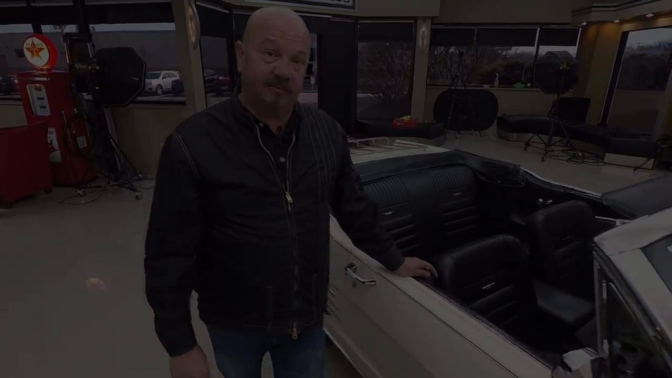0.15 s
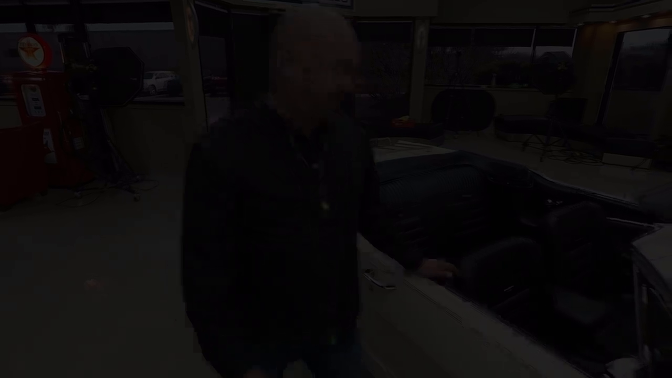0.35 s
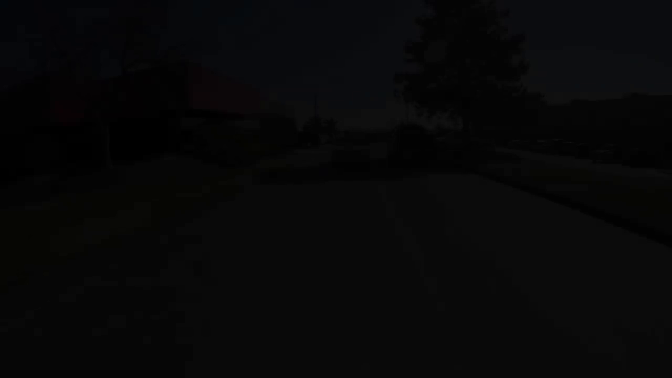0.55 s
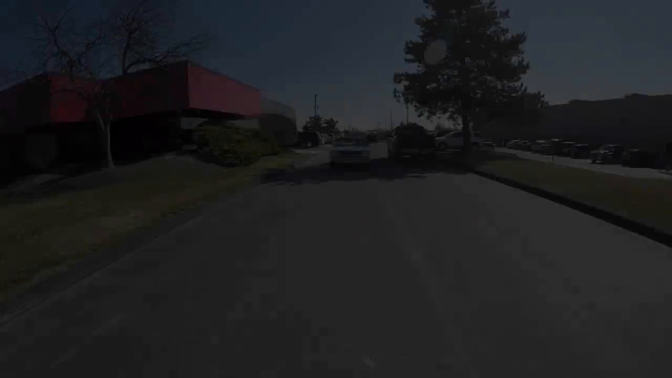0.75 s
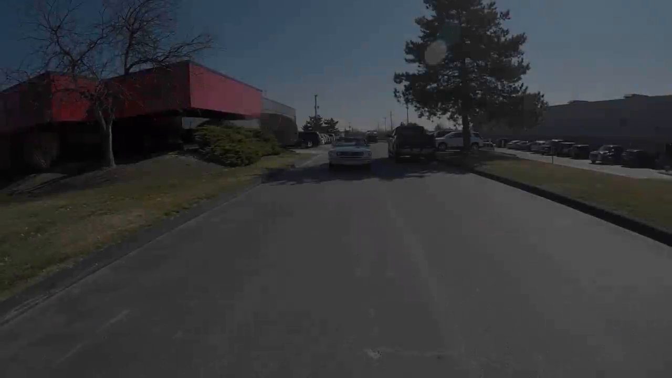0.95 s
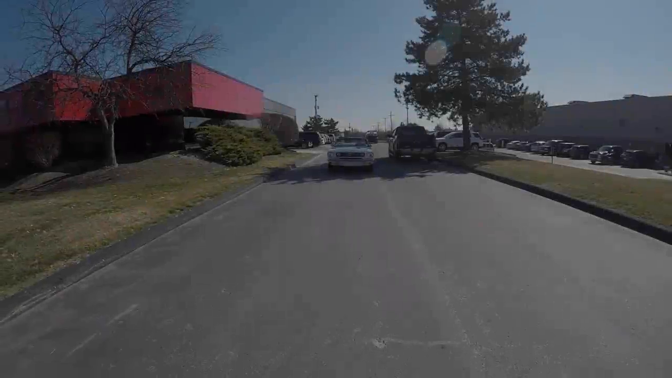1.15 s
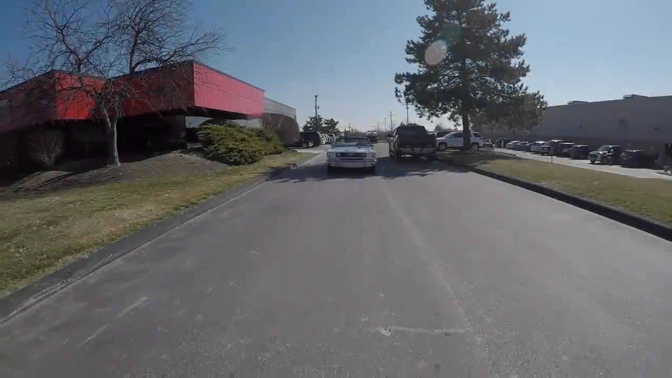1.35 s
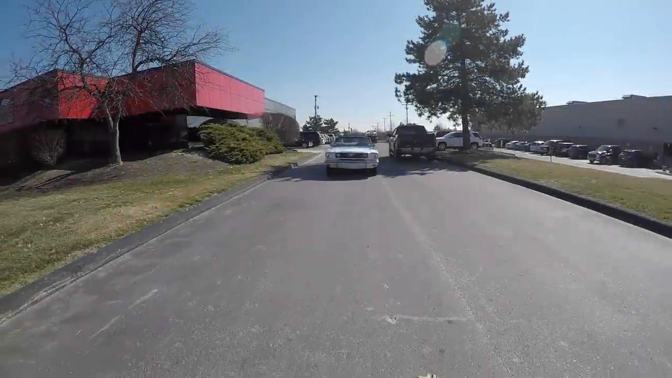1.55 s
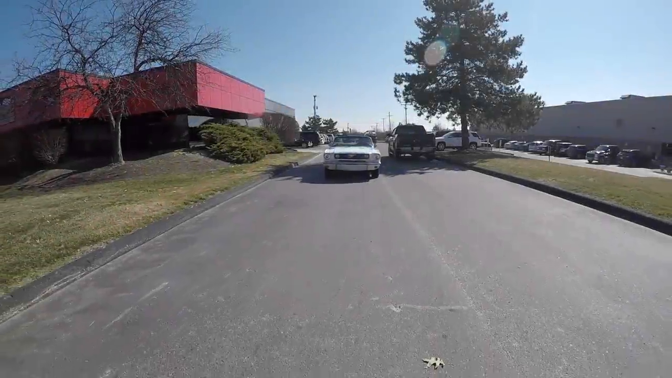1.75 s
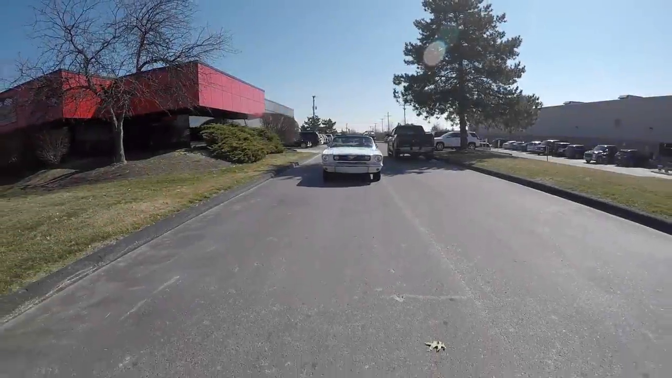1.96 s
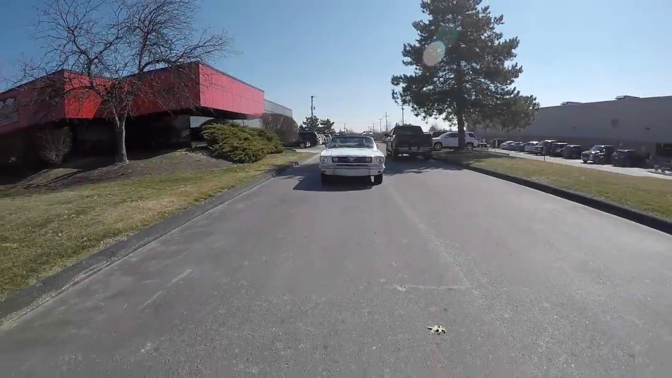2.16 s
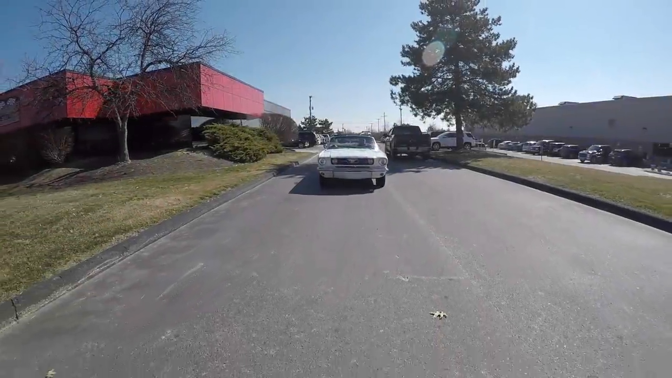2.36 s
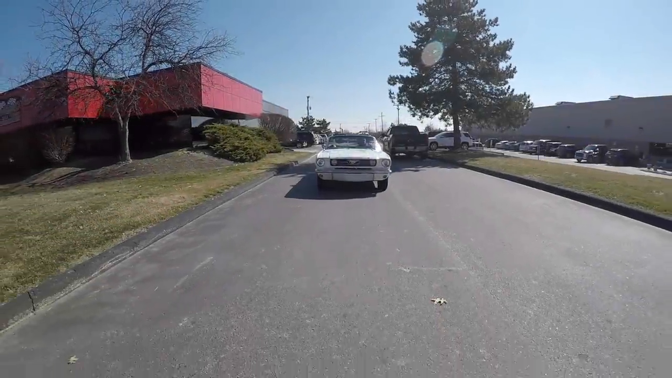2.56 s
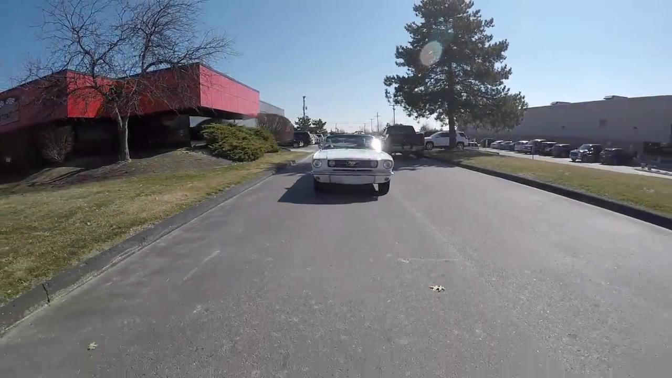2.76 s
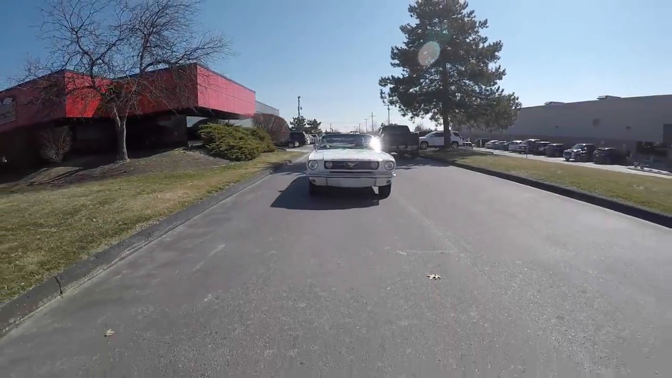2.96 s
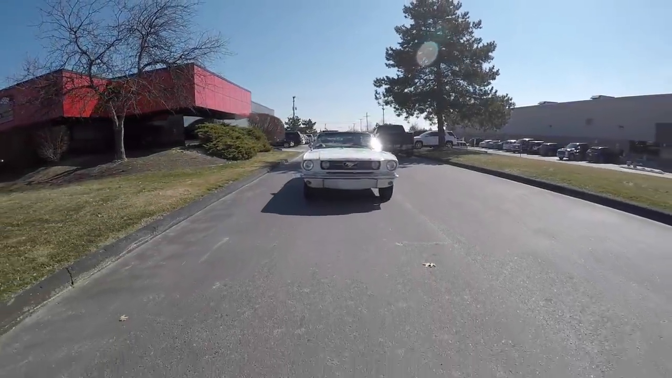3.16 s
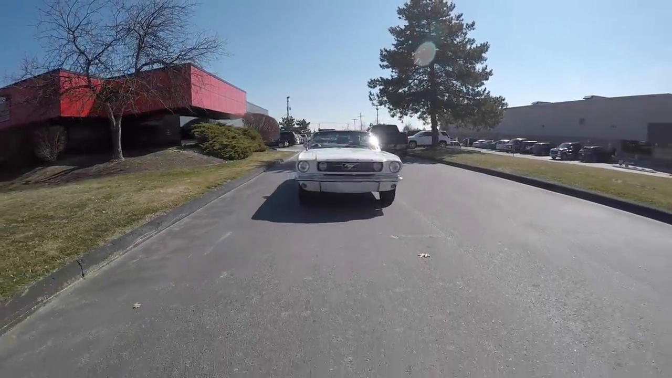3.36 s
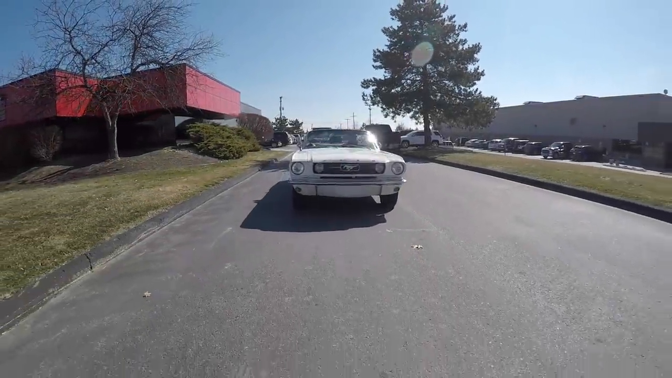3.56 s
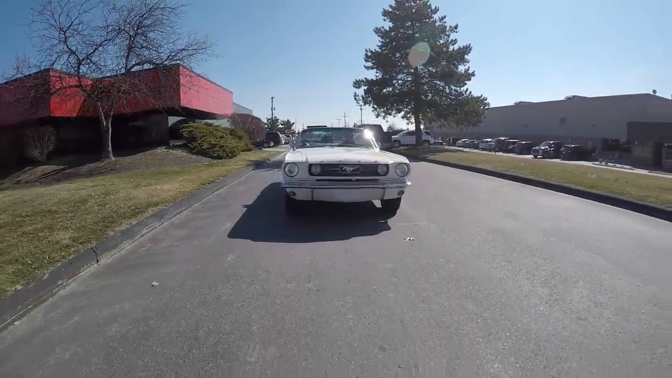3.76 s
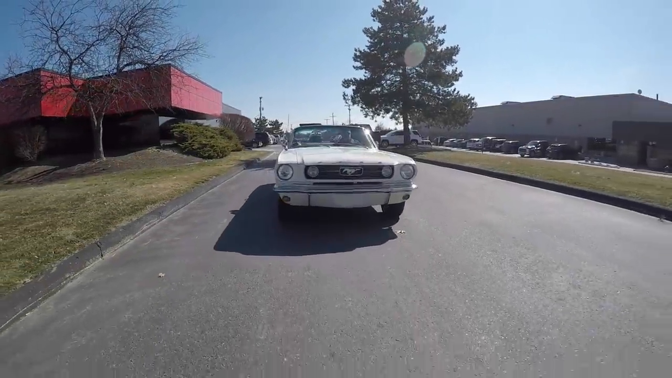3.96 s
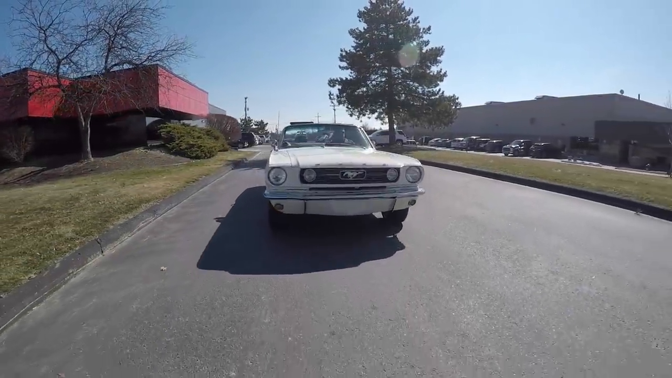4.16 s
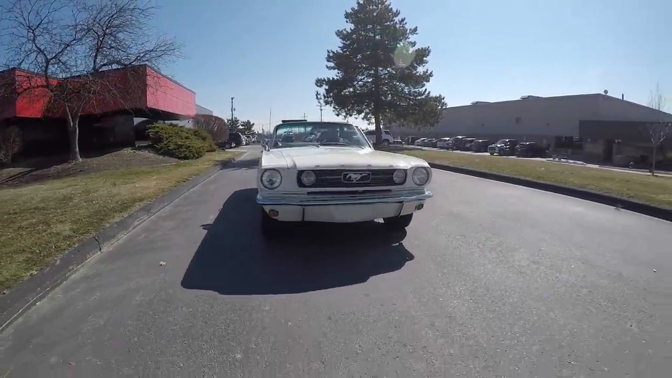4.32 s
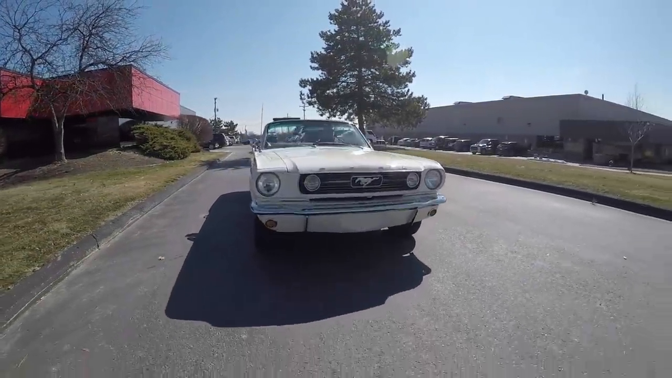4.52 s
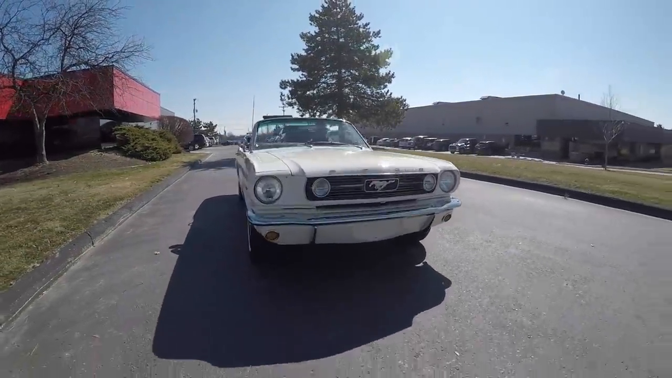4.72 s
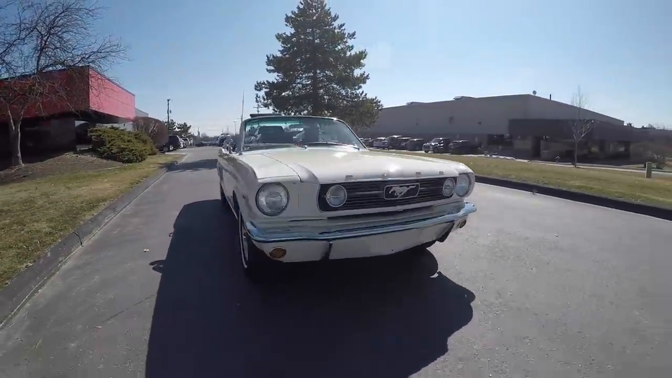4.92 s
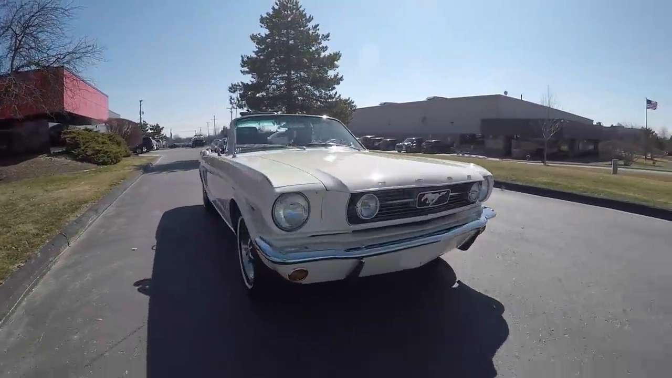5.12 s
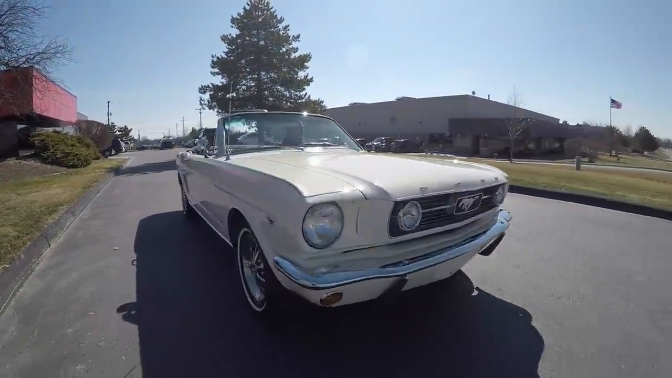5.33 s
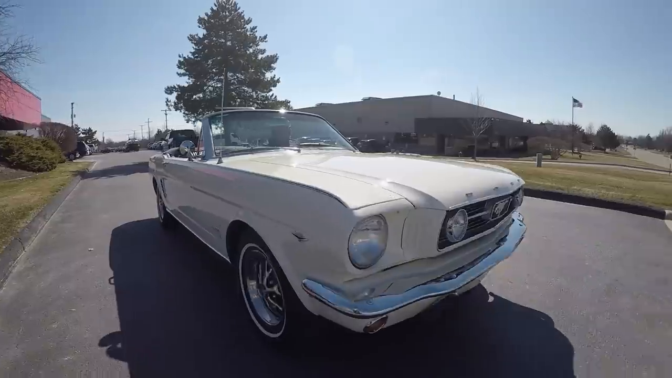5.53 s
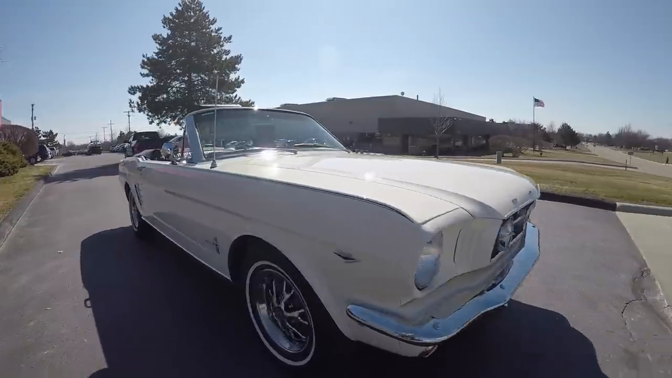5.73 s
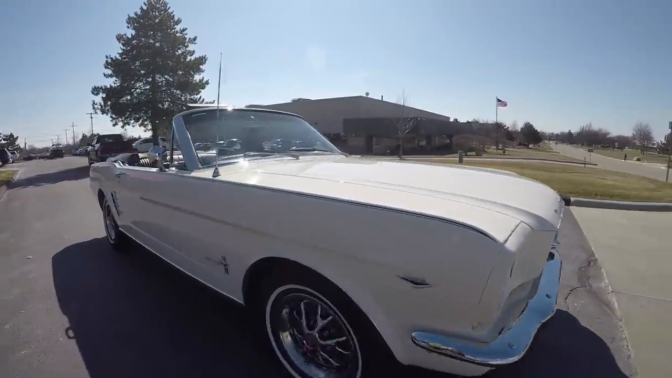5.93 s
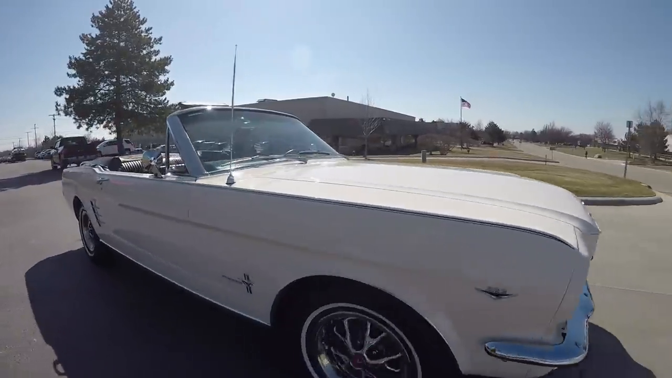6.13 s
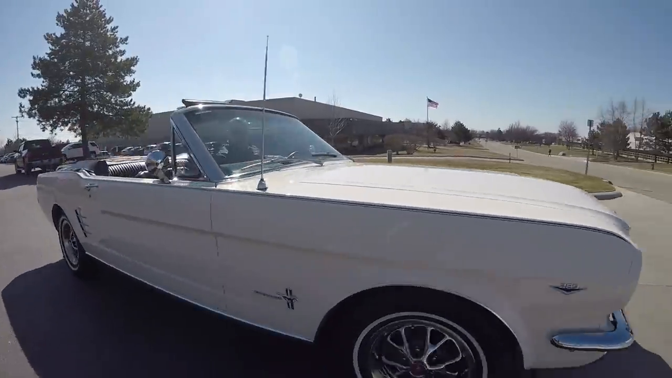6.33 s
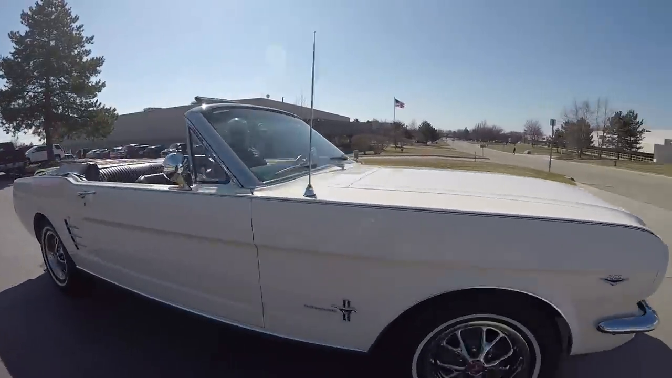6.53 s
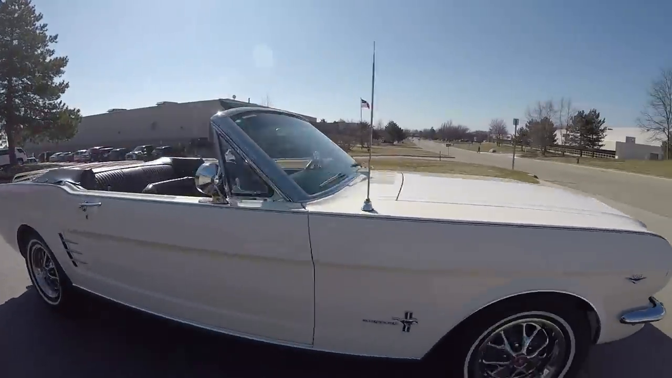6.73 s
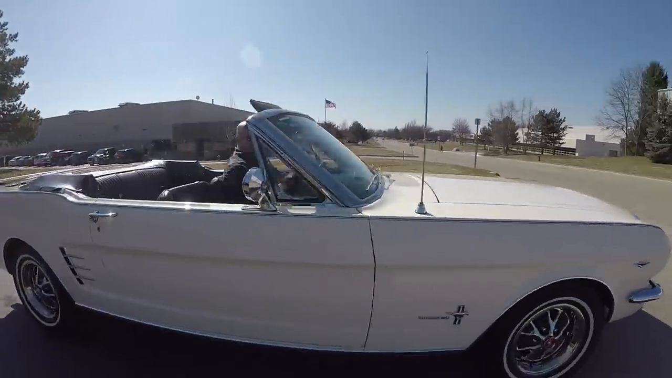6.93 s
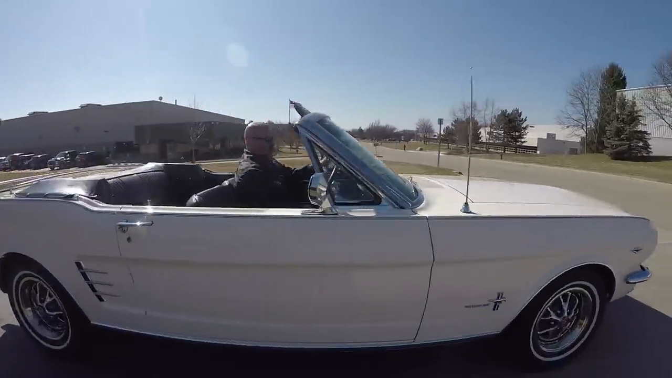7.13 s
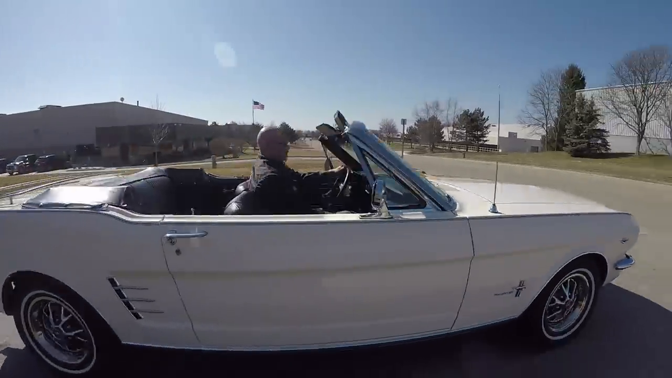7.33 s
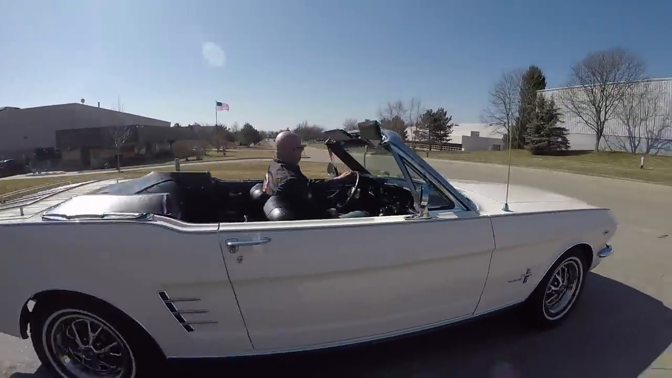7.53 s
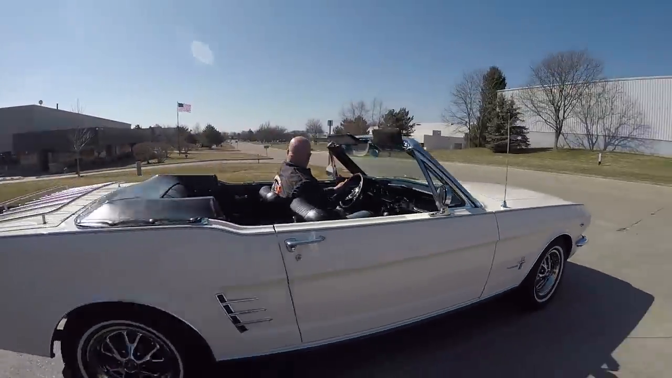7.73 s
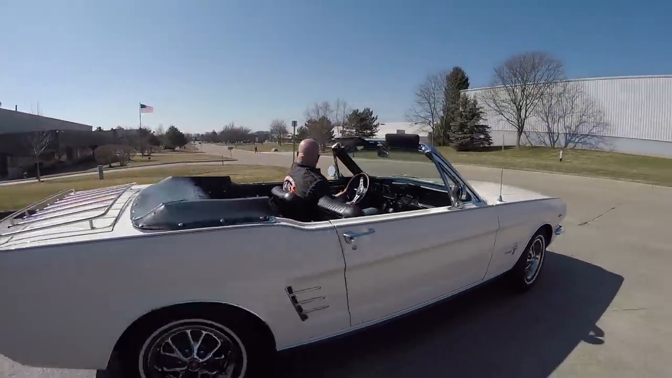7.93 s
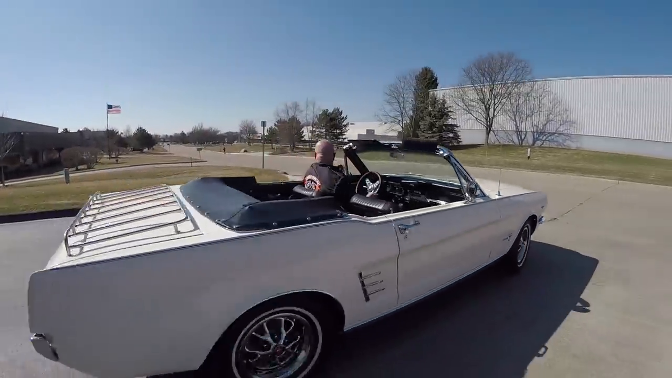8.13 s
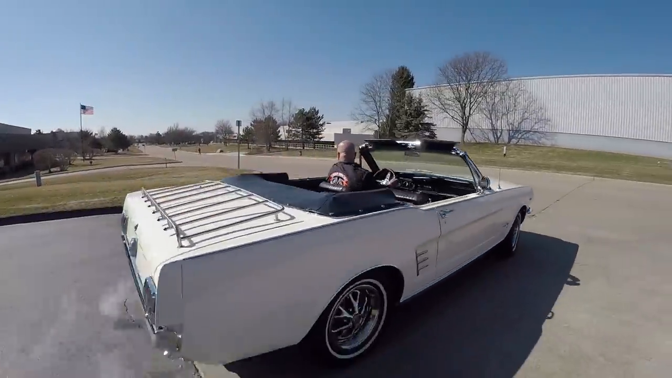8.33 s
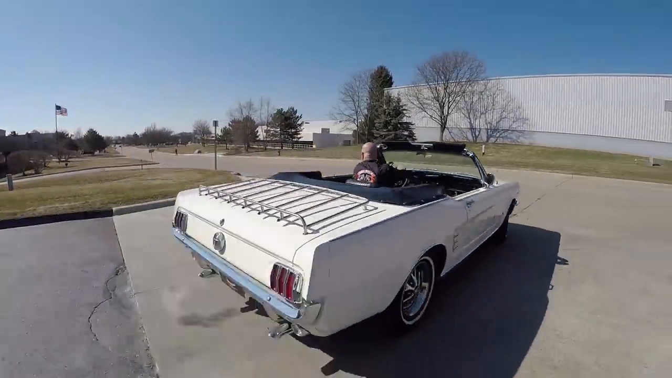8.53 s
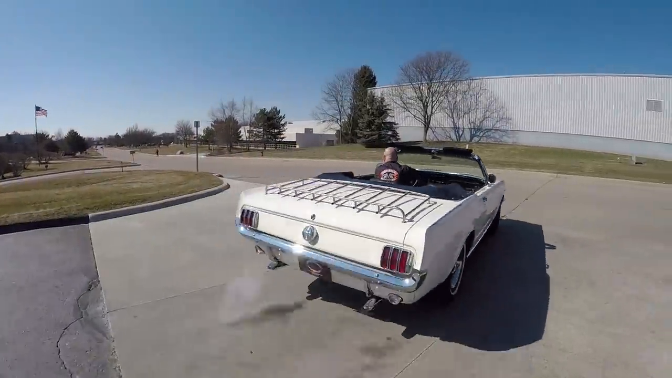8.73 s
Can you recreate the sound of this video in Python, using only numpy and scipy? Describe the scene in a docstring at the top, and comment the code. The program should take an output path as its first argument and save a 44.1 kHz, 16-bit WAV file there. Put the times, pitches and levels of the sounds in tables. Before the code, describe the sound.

Outdoors on a paved road, after a brief hushed interior, a small fixed camera catches a vintage V8 car creeping up and past. The distant lumpy hum grows, joined by airy fan noise, metallic ticking and short tyre chirrs. A pulsing underbody hiss surges close by, then puffing, bright exhaust takes over, with wind buffets and a final louder burst of low throbbing.

```python
"""Quiet room tone fades out; the outdoors fades in, with breeze (shaped noise) rumbling on the microphone.
An old V8 convertible creeps up a road: a lumpy hum (sines on the engine cycle), fan rush (noise), spitting ticks
(noise bursts timed by the firings), a few tyre scuffs. As its side goes by, a throbbing hiss gushes from below.
Then the twin tailpipes face a small camera, blatting (filtered pulses) and hissing (noise in puffs).
Last, the exhaust swells as the car pulls away."""
import sys
import numpy as np
from scipy import signal
from scipy.fft import rfft, irfft, next_fast_len
from scipy.io import wavfile
from scipy.ndimage import uniform_filter1d

SR = 44100
rng = np.random.default_rng(int(sys.argv[2]) if len(sys.argv) > 2 else 0)


def wrap_up_sound(samples):
    """Save the sound to the file named by the first command line argument, as 16-bit audio."""
    columns = np.atleast_2d(samples).T
    # keep every value between -1 and 1, then stretch to whole-number steps
    tamed = np.clip(columns, -1, 1)
    steps = np.round(tamed * 32767).astype(np.int16)
    wavfile.write(sys.argv[1], SR, steps)


N = 391608
T = np.arange(N) / SR

# steady roll: when engine bay and tail are abreast, and their distance then
ROLL_M_S, BAY_ABREAST_S, BAY_GAP_M, TAIL_ABREAST_S, TAIL_GAP_M = 1.9, 6.72, 2.11, 8.63, 1.79
# grille faces the microphone for a while: at_s, over_s, gained_db
GRILLE = (4.56, 0.48, 2.7)


def undb(db):
    """Decibels to gain."""
    return 10 ** (np.asarray(db) / 20)


def gain_curve(table, fade_s):
    """Gain from (s, dB) points, dying away outside their span."""
    s, db = np.transpose(table)
    outside_s = np.maximum(s[0] - T, 0) + np.maximum(T - s[-1], 0)
    return undb(np.interp(T, s, db)) * np.exp(-(outside_s / fade_s) ** 2)


def swell(at_s, over_s, peak=1):
    """A bell-shaped rise and fall."""
    return peak * np.exp(-.5 * ((T - at_s) / over_s) ** 2)


def onset(at_s, over_s, db=0):
    """A smooth step from silence up to a level."""
    return undb(db) * (1 + np.tanh((T - at_s) / over_s / 2)) / 2


def passing(abreast_s, gap_m, falloff):
    """Distance gain of a rolling part, 1 at its closest; falloff 1 is free field."""
    return (gap_m / np.hypot(ROLL_M_S * (T - abreast_s), gap_m)) ** falloff


def noise():
    """White noise of rms 1."""
    return rng.standard_normal(N)


def walk(rate_hz):
    """Smooth random wander with a spread near 1."""
    hold = max(int(SR / rate_hz), 1)
    steps = np.repeat(rng.standard_normal(N // hold + 1), hold)
    return np.sqrt(np.pi / 2) * uniform_filter1d(steps, hold)[:N]


# band in which each layer's rms is set, by layer name: low_hz, high_hz
LEVEL_BANDS = dict(blat=(220, 600), mouth=(1500, 2600), jet=(3300, 7000), spray=(8000, 14000),
               gush=(3000, 14000), rush=(700, 2500), hiss=(4000, 12000), tick=(9000, 15000), wind=(15, 50),
               room=(80, 5000))


def colour(x, points, layer):
    """Minimum-phase filter through (Hz, dB) points; the result has rms 1 inside the layer's band."""
    hz, db = np.transpose(points)
    low_hz, high_hz = LEVEL_BANDS[layer]
    size = next_fast_len(N + SR // 2) * 2
    f = np.maximum(np.arange(size // 2 + 1) * SR / size, 1)
    octaves_outside = np.maximum(np.log2(hz[0] / f), 0) + np.maximum(np.log2(f / hz[-1]), 0)
    # 30 dB per octave beyond the points, for two octaves
    gain_db = np.interp(np.log(f), np.log(hz), db) - 30 * np.minimum(octaves_outside, 2)
    # folding the cepstrum makes the filter causal
    cepstrum = irfft(gain_db * np.log(10) / 20)[:size // 2]
    cepstrum[1:] *= 2
    spectrum = rfft(x, size) * np.exp(rfft(cepstrum, size))
    in_band = (f > low_hz) & (f < high_hz)
    power = 2 * np.sum(np.abs(spectrum[in_band]) ** 2) / size / N
    return irfft(spectrum)[:N] / np.sqrt(power)


def ring(hz, width_hz):
    """Turbulence heard through one resonance, rms 1."""
    y = signal.lfilter(*signal.iirpeak(hz, hz / width_hz, fs=SR), noise())
    return y / np.std(y)


def clicks(at, sizes):
    """Single-sample pulses at the given sample places."""
    return np.bincount(np.clip(at, 0, N - 1).astype(int), sizes, N)


def decay(x, seconds):
    """Every pulse gets an exponential tail."""
    return signal.lfilter([1], [1, -np.exp(-1 / (seconds * SR))], x)


def chirps(centre_hz, per_second, length_s, spread_octaves, glide):
    """Short gliding whistles at random times and pitches around a centre curve, rms 1."""
    out = np.zeros(N)
    t = np.arange(-SR // 50, SR // 50) / SR
    envelope = np.exp(-.5 * (t / length_s) ** 2)
    for when, pitch, bend, size in rng.random((int(per_second * N / SR), 4)):
        i = int(when * (N - len(t)))
        hz = centre_hz[i] * 2 ** (spread_octaves * (2 * pitch - 1))
        phase = 2 * np.pi * hz * (t + glide * (2 * bend - 1) * t ** 2)
        out[i:i + len(t)] += (.5 + size) * envelope * np.sin(phase)
    return out / np.std(out)


# room tone: time_s, level_db
ROOM_LEVEL = [(0, -64.5), (.19, -63), (.28, -70), (.45, -71), (.54, -95)]
# room spectrum: freq_hz, gain_db
ROOM_SPECTRUM = [(40, -10), (85, 0.5), (300, -1.5), (600, -7), (1400, -9.5), (3000, -17), (6000, -23),
                 (14000, -33)]


def room_tone():
    """Steady shaped noise of a quiet room, faded out early."""
    return gain_curve(ROOM_LEVEL, fade_s=.069) * colour(noise(), ROOM_SPECTRUM, "room")


# breeze on the microphone: time_s, level_db
WIND_LEVEL = [(.55, -78), (.64, -48), (.9, -37), (1.25, -33.5), (1.7, -49.5), (2.15, -45.5), (2.3, -39),
              (2.68, -38), (2.92, -48.5), (3.35, -37.5), (4.1, -38.5), (4.8, -41.5), (5.2, -50), (6.6, -46),
              (7.35, -46.5), (7.87, -28), (8.05, -41), (8.19, -25), (8.45, -39), (8.7, -27), (8.88, -39)]
# breeze spectrum: freq_hz, gain_db
WIND_SPECTRUM = [(10, -3), (20, 4.5), (35, -2.5), (55, -5.5), (100, -13), (200, -26.5), (400, -40),
                 (700, -43), (1000, -49)]


def wind(buffet_db=2.4):
    """Eddies buffet the microphone: low noise with a wandering level."""
    rumble = colour(undb(buffet_db * walk(15)) * noise(), WIND_SPECTRUM, "wind")
    return gain_curve(WIND_LEVEL, fade_s=.02) * rumble


# gust spectrum: freq_hz, gain_db
GUST_SPECTRUM = [(90, 1), (200, -5), (400, -14), (900, -25)]


def early_gust(at_s=0.96, over_s=0.19, before_fade_db=-55):
    """A gust tears at the microphone port, higher up than the rumble."""
    return undb(before_fade_db) * swell(at_s, over_s) * colour(noise(), GUST_SPECTRUM, "blat")


# tyre scuffs and grit: centre_s, over_s, pitch_hz, width_hz, level_db
TYRE_SCUFFS = [(5.178, 0.022, 1100, 130, -47), (5.244, 0.11, 2500, 5000, -47.5),
               (5.27, 0.055, 1210, 150, -51), (5.305, 0.0042, 1990, 3000, -38),
               (6.043, 0.034, 1100, 110, -42), (6.12, 0.092, 4900, 8000, -44),
               (6.177, 0.064, 1190, 120, -48.5), (6.346, .006, 1000, 150, -45),
               (8.055, 0.026, 1150, 90.5, -45)]


def scuffs():
    """The tread scrubs the road in narrow chirrs and broad rasps, and snaps on grit: swells of resonant noise."""
    out = 0
    for centre_s, over_s, pitch_hz, width_hz, level_db in TYRE_SCUFFS:
        out = out + swell(centre_s, over_s, undb(level_db)) * ring(pitch_hz, width_hz)
    return out


# rush spectrum: freq_hz, gain_db
RUSH_SPECTRUM = [(240, -21), (400, -29.5), (434, 3.5), (505, -6.5), (553, -18), (600, 0), (1080, 1.5),
                 (1360, -0.5), (1920, -0.5), (2110, -1), (2660, -3), (3460, -11), (4500, -11.5),
                 (5850, -24), (9900, -120)]
# hiss spectrum: freq_hz, gain_db
HISS_SPECTRUM = [(1650, -14), (2800, -2), (3240, 0), (3510, -3.5), (3920, 0.5), (4950, 4), (5440, 0.5),
                 (6520, 1.5), (7230, -2), (8240, -4), (9600, -2), (12000, -4), (15100, -8), (16000, -23)]
# metal parts ringing in the engine bay: pitch_hz, width_hz, mean_level_db (re bay_db)
METAL_RINGS = [(948, 44, -21.5), (1427, 25, -19), (2180, 170, -12.5), (3480, 210, -13.5), (4920, 170, -18),
               (8200, 460, -10.5)]


def fan_and_tyres(rush_db=-49.5, bay_db=-45, rattle_db=4.0):
    """A broad rush and a mechanical hiss, with metal parts ringing on and off and tiny squeaks."""
    rush_gain = undb(rush_db) * passing(BAY_ABREAST_S, BAY_GAP_M, .7)
    bay_gain = undb(bay_db + swell(*GRILLE)) * passing(BAY_ABREAST_S, BAY_GAP_M, 1.23)
    rush = colour(undb(1.1 * walk(25)) * noise(), RUSH_SPECTRUM, "rush")
    hiss = colour(undb(1.4 * walk(40)) * noise(), HISS_SPECTRUM, "hiss")
    rings = 0
    for pitch_hz, width_hz, level_db in METAL_RINGS:
        rings = rings + undb(level_db + rattle_db * walk(18)) * ring(pitch_hz, width_hz)
    squeaks = chirps(np.full(N, 5500), per_second=22, length_s=.005, spread_octaves=.8, glide=1.5)
    # hiss and squeak levels relative to bay_db
    return rush_gain * rush + bay_gain * (undb(-1) * hiss + rings + undb(-13) * squeaks)


# cylinders with a leaky joint: place in the firing order, mean_level_db (relative)
LEAKY_CYLINDERS = [(0, -6.5), (3, -2), (4, -13.5), (6, -3)]
# eight places in the cycle, bank each blows into: 0 near, 1 far
FIRING_BANKS = [0, 1, 0, 0, 1, 0, 1, 1]
# tick spectrum: freq_hz, gain_db
TICK_SPECTRUM = [(1500, -37), (2800, -7), (3500, -0.5), (4200, -6), (5000, -2), (7200, -6), (8400, -2),
                 (9600, -2.5), (11500, 2.5), (13300, 0), (15500, -11)]


def ticks(cycle, tick_db=-37.5, lag_s=0.0039, scatter_db=3, rise_s=0.0012, ring_s=0.018):
    """The leaky cylinders spit each time they fire; each spit dies away in the engine bay."""
    spits = 0
    for place, level_db in LEAKY_CYLINDERS:
        turns = np.floor(cycle - round(place) / len(FIRING_BANKS))
        at = np.flatnonzero(np.diff(turns) > 0)
        chance = np.clip(rng.standard_normal(len(at)), -2, 2)
        spits = spits + clicks(at + lag_s * SR, undb(level_db + scatter_db * chance))
    envelope = decay(decay(spits, ring_s), rise_s) / (rise_s * SR)
    # the spits beam more tightly than the hiss, so the grille adds 1.36 times the dB
    gain = undb(tick_db + 1.36 * swell(*GRILLE)) * passing(BAY_ABREAST_S, BAY_GAP_M, 1.57)
    return gain * envelope * colour(noise(), TICK_SPECTRUM, "tick")


# gas under the car: peak_s, rise_s, fall_s, hiss_db, thump_db
GAS_GUSHES = [(7.54, 0.092, 0.055, -24.5, -32), (7.87, 0.25, 0.17, -42, -45.5)]


def gushing():
    """Each gush swells and sinks: gain of its hiss and of its thumping."""
    hiss_gain, thump_gain = 0, 0
    for peak_s, rise_s, fall_s, hiss_db, thump_db in GAS_GUSHES:
        shape = swell(peak_s, np.where(T < peak_s, rise_s, fall_s))
        hiss_gain = hiss_gain + undb(hiss_db) * shape
        thump_gain = thump_gain + undb(thump_db) * shape
    return hiss_gain, thump_gain


# gush spectrum: freq_hz, gain_db
GUSH_SPECTRUM = [(350, -16), (500, -19), (780, -13), (980, -8), (1300, -7.5), (1700, -4), (2300, -1.5),
                 (2900, -7.5), (3500, -2.5), (4400, -1), (6200, -2.5), (7500, -6), (11500, -2.5),
                 (16000, -12.5)]
# hollows under the body: pitch_hz, width_hz, level_db (re hiss)
BODY_HOLLOWS = [(1025, 43, -17), (1626, 67, -14.5), (2480, 77, -12.5), (3500, 120, -14.5), (6300, 370, -13)]


def underside(pulses, trim_db=-1, steady=1.2, swirl_db=1):
    """A throbbing hiss gushes from under the car, with narrow noise for its ringing hollows."""
    flow = (steady + decay(pulses, 0.013)) * undb(swirl_db * walk(60))
    hiss = colour(flow * noise(), GUSH_SPECTRUM, "gush")
    rings = sum(undb(level_db) * ring(pitch_hz, width_hz) for pitch_hz, width_hz, level_db in BODY_HOLLOWS)
    hiss_gain, _ = gushing()
    return undb(trim_db) * hiss_gain * (hiss + rings)


# spectra of pipe mouths, jet and finest spray: freq_hz, gain_db
MOUTH_SPECTRUM = [(700, -18), (1200, -17.5), (1500, -13), (1830, -2), (2050, -6.5), (2400, -7), (2800, -16),
                  (3200, -18)]
JET_SPECTRUM = [(2600, -23), (3200, -6), (3600, 5), (4200, -1.5), (4800, -3), (5600, 1.5), (6500, -5),
                (7500, -25), (10000, -8)]
SPRAY_SPECTRUM = [(5000, 2.5), (7000, 3.5), (8000, 3), (9200, -0.5), (11000, -3), (13500, -6), (15700, -15)]


def tailpipes(pulses, mouth_db=-31, jet_db=-30, whistle_db=-33, spray_db=-30, steady=0.8, swirl_db=2.5):
    """Gas leaves in puffs, rings the pipe mouths and hisses brighter as they point at the microphone."""
    flow = steady + decay(decay(pulses, 0.0087), 0.00077) / (0.00088 * SR)
    mouth = colour(flow * noise(), MOUTH_SPECTRUM, "mouth")
    jet = colour(flow * undb(swirl_db * walk(50)) * noise(), JET_SPECTRUM, "jet")
    spray = colour(flow * undb(2.8 * walk(60)) * noise(), SPRAY_SPECTRUM, "spray")
    # eddies at the pipe lips whistle for a moment each
    whistle_hz = np.interp(T, [8.25, 8.55, 8.88], [4500, 5900, 7000])
    whistles = chirps(whistle_hz, per_second=260, length_s=.003, spread_octaves=.5, glide=4)
    # the microphone enters the beam, finest spray last
    out = onset(8.245, 0.082, mouth_db) * mouth
    out += onset(8.254, 0.059) * (undb(jet_db) * jet + undb(whistle_db) * whistles)
    return out + onset(8.478, 0.14, spray_db) * spray


def firings(cycle, scatter_db=1.45, far_bank_db=-4, far_lag_s=.002, jitter_s=0.00062):
    """Eight pulses a cycle, shared unevenly between two banks; the far pipe is later and weaker."""
    at = np.flatnonzero(np.diff(np.floor(cycle * len(FIRING_BANKS))) > 0)
    far = np.resize(FIRING_BANKS, len(at))
    time_chance, level_chance = np.clip(rng.standard_normal((2, len(at))), -2, 2)
    lag_s = far_lag_s * far + jitter_s * time_chance
    return clicks(at + SR * lag_s, undb(far_bank_db * far + scatter_db * level_chance))


def hum(cycle, lines, flutter_db=2):
    """Lines on multiples of the engine cycle beat into a lumpy burble; uneven combustion shakes each."""
    # the crank runs a little ahead or behind, which blurs the high lines most
    crank = cycle + .002 * walk(16)
    out = 0
    for multiple, level_db in lines:
        phase = 2 * np.pi * (round(multiple) * crank + rng.random())
        out = out + undb(level_db + flutter_db * walk(14)) * np.sin(phase)
    return out / np.std(out)


# hum lines from the front and from behind: multiple of the eight-cylinder cycle, mean_level_db (relative)
FRONT_LINES = [(7, -7.5), (13, -33), (15, -3.5), (16, 1), (17, -13), (19, -4), (21, -14.5), (29, -10.5),
               (32, -14), (35, -21.5), (45, -28.5), (46, -23.5), (47, -20.5), (60, -26.5), (75, -29)]
REAR_LINES = [(7, -8), (11, -3.5), (14, -1.5), (15, 1), (16, -15), (18, -3), (23, -11.5), (35, -10.5),
              (38, -24), (46, -14), (75, -19.5)]
# blat spectrum: freq_hz, gain_db
BLAT_SPECTRUM = [(40, -25), (80, 3.5), (130, 4), (180, 3), (260, -0.5), (345, -2), (405, -9), (510, -11),
                 (555, -6), (610, -17.5), (750, -11), (1200, -22.5), (3000, -51)]


def exhaust(cycle, pulses, hum_db=-29, boom_db=-42.5, blat_db=-48, beam_db=-37.5, rough=0.077):
    """The hum changes its lines as the tail swings round; each firing thumps the pipes with a turbulent puff."""
    behind = np.clip((T - 7.5) / 1.0, 0, 1)
    drone = np.sqrt(1 - behind) * hum(cycle, FRONT_LINES)
    drone += undb(-0.5) * np.sqrt(behind) * hum(cycle, REAR_LINES)
    boom = hum(cycle, [(len(FIRING_BANKS), 0)])
    puffs = rough * decay(pulses, 0.019) * noise()
    thumps = colour(pulses + puffs, BLAT_SPECTRUM, "blat")

    # road and house fronts carry some layers further
    near = passing(TAIL_ABREAST_S, TAIL_GAP_M, 1)
    pull = onset(8.73, 0.02)  # the car pulls away: 7.5 dB more hum, 10 dB more blat in the beam
    wheel_well_db, front_gap_db = swell(6.41, 0.22, 4), swell(5.9, 0.66, 4.4)  # openings face the microphone
    drone_gain = undb(hum_db + wheel_well_db + 7.5 * pull) * near ** 1.283
    boom_gain = undb(boom_db) * near ** 0.46
    _, gush_thump_gain = gushing()
    thump_gain = undb(blat_db + front_gap_db) * near ** 0.94 + gush_thump_gain
    thump_gain += onset(8.35, 0.044, beam_db) * undb(10 * pull)
    return boom_gain * boom + drone_gain * drone + thump_gain * thumps


# short paths off road, wheel wells and panels: far_delay_s, past_delay_s, gain
REFLECTIONS = [(.0007, 0.00107, 0.0033), (.0019, 0.0016, -0.051), (.0036, .0031, .2), (.0068, .0076, -0.13)]


def bounces(x):
    """Short reflections comb the sound; their paths drift as the car rolls on."""
    out, place = x, np.arange(N)
    fine = signal.resample_poly(x, 4, 1)  # finer grid for fractional delays
    fine_place = np.linspace(0, N, len(fine), endpoint=False)
    for far_s, past_s, gain in REFLECTIONS:
        lag = np.interp(T, [0, T[-1]], [far_s, past_s]) * SR
        out = out + gain * np.interp(place - lag, fine_place, fine, left=0)
    return out / np.sqrt(1 + sum(gain ** 2 for *_, gain in REFLECTIONS))


def far_off(x, edge_hz=6500):
    """The finest treble gets lost on the way while the car is distant, and clears as it nears."""
    soft = signal.sosfilt(signal.butter(1, edge_hz, fs=SR, output="sos"), x)
    return soft + onset(1.44, 0.46) * (x - soft)


# engine speed: time_s, firing_rate_hz
FIRING_RATE = [(0.6, 61.27), (1.7, 60.44), (2.2, 56.94), (2.7, 58.42), (3.0, 60.48), (4.6, 59.46),
               (5.4, 57.08), (5.8, 58.64), (6.6, 58.34), (7.0, 59.53), (7.8, 57.79), (8.2, 59.5),
               (8.5, 58.6), (8.88, 58.7)]


def scene(fade_start_s=0.56, fade_length_s=0.92, fade_curve=0.5):
    """One crankshaft drives hum, thumps and puffs; the hisses reach the microphone by several paths."""
    firing_hz = np.interp(T, *np.transpose(FIRING_RATE))
    cycle = np.cumsum(firing_hz) / SR / len(FIRING_BANKS)
    pulses = firings(cycle)
    background = room_tone() + wind()
    hisses = fan_and_tyres() + ticks(cycle) + underside(pulses) + tailpipes(pulses)
    outdoors = early_gust() + scuffs() + far_off(bounces(hisses)) + exhaust(cycle, pulses)
    fade = np.clip((T - fade_start_s) / fade_length_s, 0, 1) ** fade_curve
    return (background + fade * outdoors)[None]


def record(dry, top_hz=15750):
    """The camera cuts the top of the treble."""
    return signal.sosfilt(signal.ellip(10, .2, 80, top_hz, fs=SR, output="sos"), dry)


dry = scene()
out = record(dry)
wrap_up_sound(out)
```